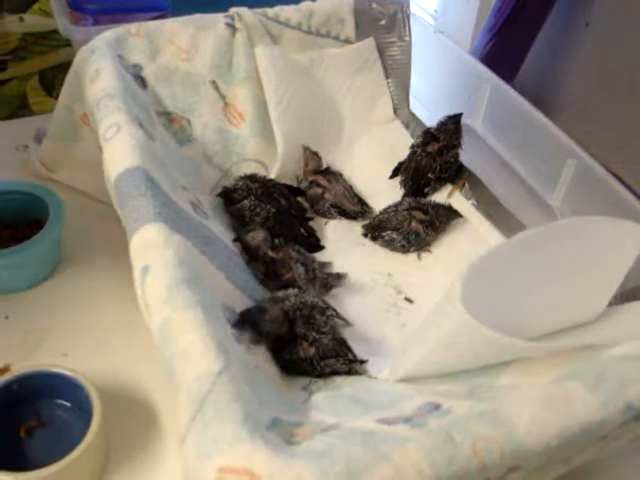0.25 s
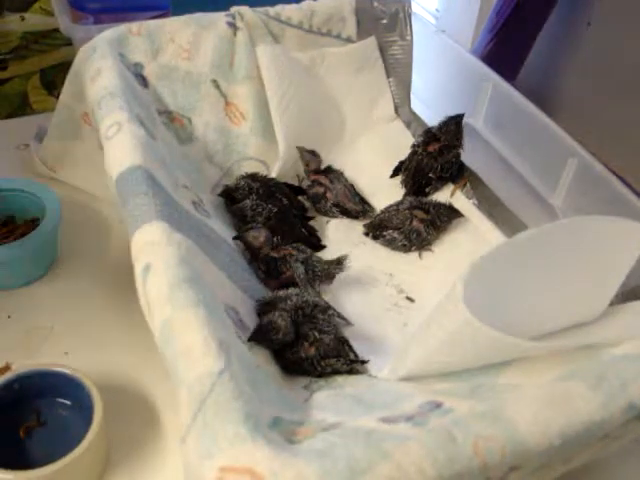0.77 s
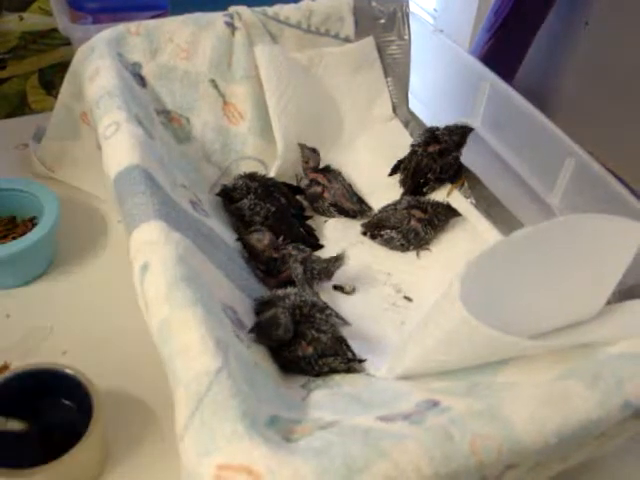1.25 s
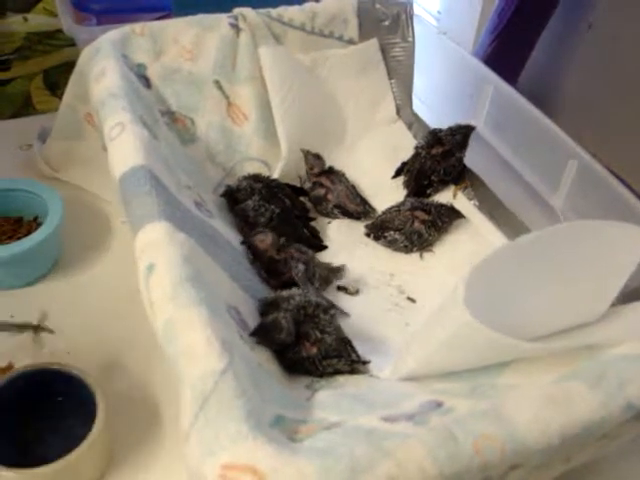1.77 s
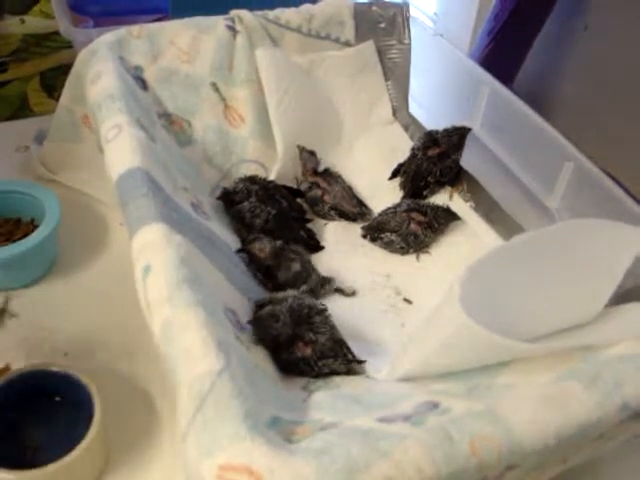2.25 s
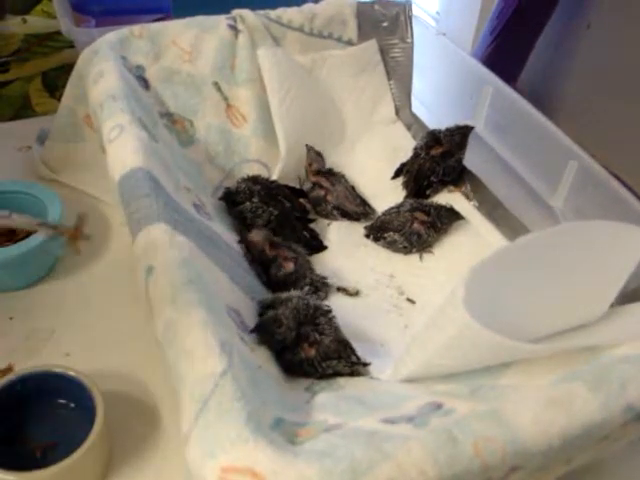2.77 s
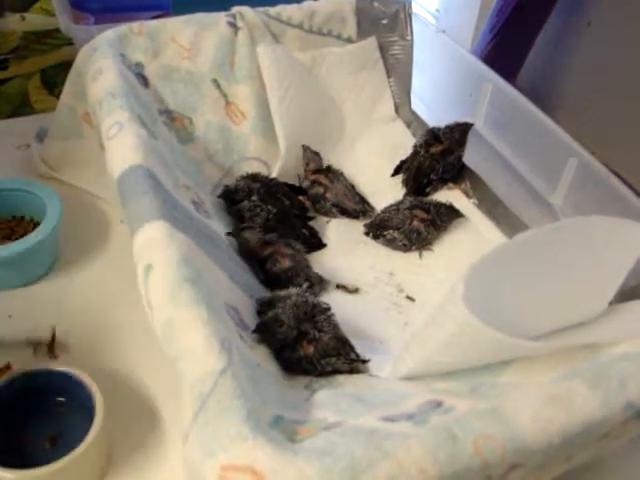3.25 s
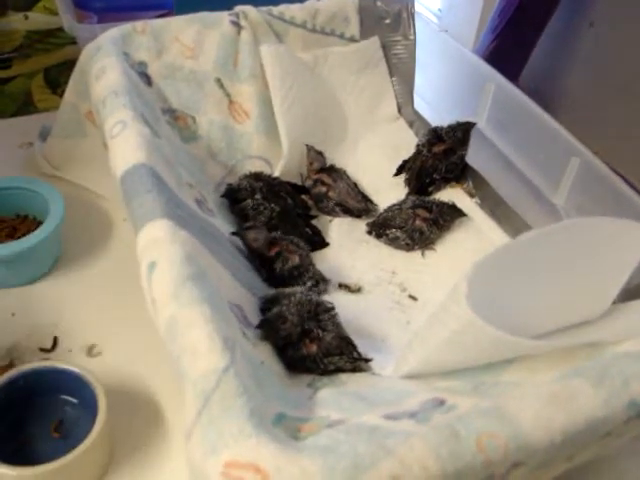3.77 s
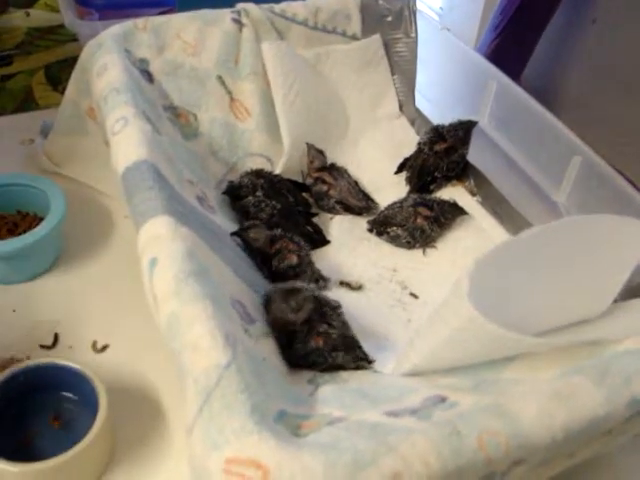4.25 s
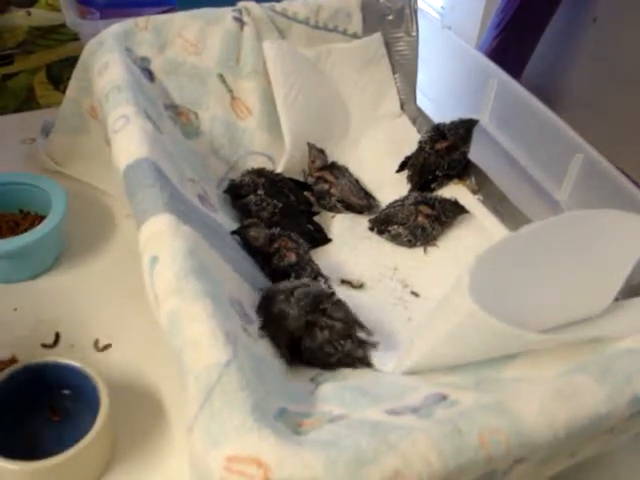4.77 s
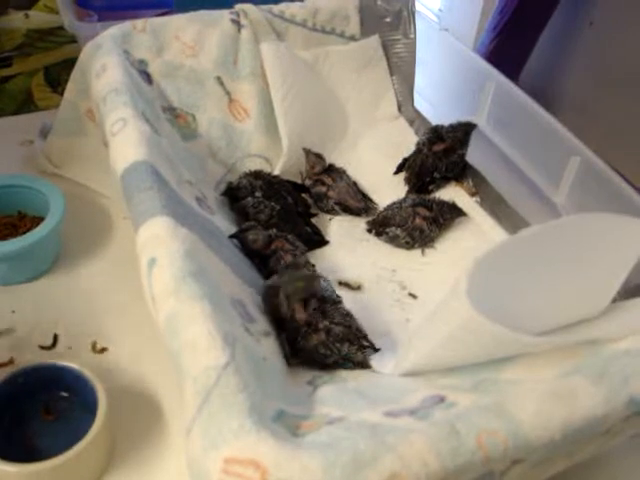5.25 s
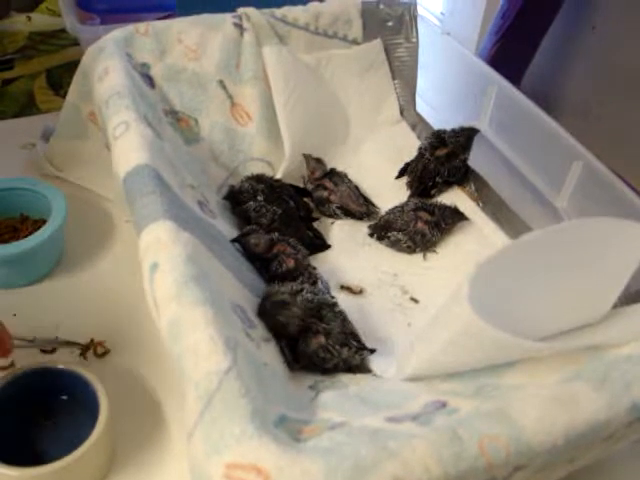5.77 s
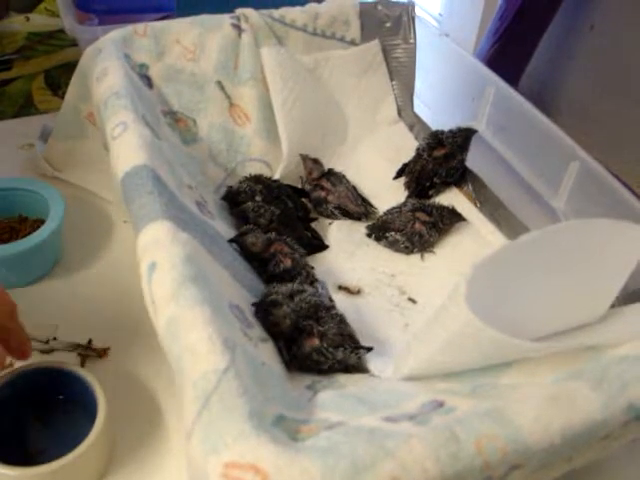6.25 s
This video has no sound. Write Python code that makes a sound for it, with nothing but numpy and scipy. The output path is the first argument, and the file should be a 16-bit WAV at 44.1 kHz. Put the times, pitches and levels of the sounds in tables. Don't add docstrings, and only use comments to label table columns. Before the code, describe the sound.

Hungry nestlings call from a cloth-lined plastic tub indoors. Bright, snapping chirps with a raspy fall repeat about three times a second, mixed with fainter peeps, tiny ticks and a few long fluttering whistles that sag in pitch. Later chirps are softer, and a whistle comes near the end. A quiet motor hum and fan hiss continue beneath. A small camera microphone hears it close, with slightly thin, patchy treble.

```python
import sys
import numpy as np
from scipy import signal
from scipy.fft import rfft, irfft
from scipy.io import wavfile
from scipy.ndimage import uniform_filter1d, minimum_filter1d

SR = 44100
rng = np.random.default_rng(int(sys.argv[2]) if len(sys.argv) > 2 else 0)


def wav_out(sig):
    wavfile.write(sys.argv[1], SR, np.round(np.clip(np.atleast_2d(sig).T, -1, 1) * 32767).astype(np.int16))


def ratio(d):
    e = np.asarray(d, float) / 20
    return 10 ** e


N = 287091
TOP_HZ = 10020


def band(x, lo_hz, hi_hz, order=2):
    return signal.sosfiltfilt(signal.butter(order, [lo_hz, hi_hz], "band", fs=SR, output="sos"), x)


def unit(x):
    return x / np.sqrt(np.mean(x ** 2))


def walk(rate, size=N):
    k = int(SR / max(rate, .1)) + 1
    steps = np.repeat(rng.standard_normal(size // 20 + 2)[:size // k + 1], k)
    return 1.89 * uniform_filter1d(uniform_filter1d(steps, k), k)[:size]


# t/s, shaft f/Hz, level of the fifth multiple/dB
MOTOR_SPEED = [(0, 76.05, -42.5), (0.899, 73.9, -50), (1.597, 73.7, -45.5), (2.598, 71.74, -44),
               (2.9, 70.7, -43.5), (3.198, 73.76, -43), (3.4, 76.5, -42.5), (4.1, 76.76, -40),
               (4.901, 76.97, -43.5), (6.51, 76.45, -40)]
# multiple of the shaft rate, level/dB
MOTOR_MULTIPLES = [(2, -12), (3, -10.5), (4, -5), (5, 1), (6, -5.5), (7, -4.5), (8, -11), (9, -23.5)]
# f/Hz, level/dB
STEADY_HUM = [(57, -58), (70, -53), (119.5, -48), (824, -51), (904, -62.5), (964, -57), (1076, -52.5),
              (1130, -62)]
# f/Hz, level/dB per Hz
FAN_COLOUR = [(12, -61.5), (20, -49), (121, -6.5), (188, -9), (369, 0.5), (410, -3.5), (690, -6.5),
              (1070, -5), (1220, -7.5), (1510, -7.5), (3740, -20.5), (5530, -21.5), (9070, -28.5),
              (10100, -41), (13100, -86), (22000, -120)]


def appliances():
    t = np.arange(N) / SR
    s, hz, db = np.transpose(MOTOR_SPEED)
    motor_db = np.interp(t, s, db)
    turn = 2 * np.pi * np.cumsum(np.interp(t, s, hz) * (1 + 0.0013 * walk(6.04))) / SR
    motor = sum(ratio(d + walk(7.2)) * np.sin(k * turn + walk(4)) for k, d in MOTOR_MULTIPLES)
    hum = sum(ratio(d + 0.69 * walk(3.24)) * np.sin(2 * np.pi * f * t + 0.32 * walk(3.1))
              for f, d in STEADY_HUM)
    f = np.maximum(np.arange(N // 2 + 1) * SR / N, 1)
    fan_hz, fan_db = np.transpose(FAN_COLOUR)
    colour = ratio(np.interp(np.log(f), np.log(fan_hz), fan_db))
    hiss = unit(irfft(rfft(rng.standard_normal(N)) * colour, N))
    hiss = hiss * ratio(-38 + walk(1.8) / 4 + 0.45 * (motor_db + 45.5))
    return np.sqrt(2) * (ratio(motor_db) * motor + hum) + hiss


def sing(notes, edge_ms, flutter_db, flutter_rate, rough, rough_hz, break_up, half_db, overtone_db, voiced_hz,
         rasp_db, rasp_ms, hiss_db):
    out = np.zeros(N)
    wobble, sway, near, far, grit = (walk(rate) for rate in (flutter_rate, 150, rough_hz, rough_hz, 450))
    noise = rng.standard_normal((3, N))
    chest = unit(band(noise[0], 2020, 4300))
    air = unit(band(noise[1], 3100, 6960))
    hiss = unit(band(noise[2], 6200, 9150))
    rasp = ratio(4.0 * grit) * (chest + ratio(-3) * air)
    edge = edge_ms / 1000
    hold = np.linspace(1, 0, int(rasp_ms * SR / 1000) + 2)
    for note in notes:
        s, hz, db = np.transpose(note)
        span = slice(max(int((s[0] - edge) * SR), 0), int((s[-1] + .1) * SR))
        t = np.arange(span.start, span.stop) / SR
        pitch = uniform_filter1d(np.interp(t, s, hz), 120) * (1 + 0.0015 * sway[span])
        phase = 2 * np.pi * np.cumsum(pitch) / SR
        fade = np.clip(np.minimum(t - s[0] + edge, s[-1] + edge - t) / edge, 0, 1) ** 2
        level = fade * ratio(np.interp(t, s, db))
        falling = np.clip((t - s[np.argmax(hz)] - .004) / .008, 0, 1)
        level = level / (1 + (np.gradient(pitch) * SR / 450000) ** 4) ** .5
        flutter = ratio(flutter_db * wobble[span])
        sag = np.clip(3 * (1 - pitch / hz.max()), 0, 1)
        smear = rough * (1 + break_up * falling * sag)
        tone = (flutter + smear * near[span]) * np.sin(phase) + smear * far[span] * np.cos(phase)
        half = ratio(half_db) * np.clip(pitch / 1500 - 3.6, 0, 1) * (0.22 + far[span]) * np.sin(phase / 2)
        slack = (flutter + smear * far[span]) * ratio(overtone_db) / (1 + (pitch / voiced_hz) ** 4)
        fourth = 0.25 * np.sin(4 * phase) * (pitch < 2500)
        rich = slack * (np.sin(2 * phase) + 0.23 * np.sin(3 * phase) + fourth)
        voice = np.sqrt(2) * ((tone + rich) / np.sqrt(1 + 2 * smear ** 2) + half) + ratio(hiss_db) * hiss[span]
        spill = np.sqrt(signal.fftconvolve((falling * level) ** 2, hold / hold.sum())[:len(t)].clip(0))
        out[span] += level * voice + ratio(rasp_db) * spill * rasp[span]
    return out


def glides(rows, shape):
    return [[(s + size * at, a + (b - a) * way, db + under) for at, way, under in shape]
            for s, size, a, b, db in rows]


def arches(rows, arch, snap):
    made = []
    for s, size, top, db, snap_db in rows:
        climb = [(s - size * (1 - at), hz * top / arch[2][1], db + under) for at, hz, under in arch]
        fall = [(s + later, hz, snap_db + under) for later, hz, under in snap]
        made.append(climb + fall)
    return made


# snap t/s, arch length/s, top f/Hz, arch level/dB, snap level/dB
BOLD_CHIRPS = [(.06, .035, 7740, -12, -18.5), (0.323, 0.033, 8670, -13, -18.5),
               (0.569, 0.039, 8270, -16.5, -15.5), (.873, 0.026, 8160, -13, -12.5),
               (1.178, 0.034, 8020, -16, -13.5), (1.92, 0.028, 7300, -21.5, -12),
               (2.594, .034, 7670, -20.5, -10.5), (2.928, 0.027, 7467, -18, -13),
               (3.271, 0.022, 6780, -18.5, -12)]
# snap t/s, arch length/s, top f/Hz, arch level/dB, snap level/dB
SOFT_CHIRPS = [(3.963, .035, 6190, -21, -20.5), (4.247, .043, 7950, -23.5, -19),
               (4.58, .032, 8120, -20, -17.5), (4.862, 0.03, 7967, -22, -17),
               (5.132, 0.032, 8030, -28, -16.5), (5.586, 0.025, 5880, -27, -18),
               (5.886, 0.031, 7190, -26.5, -17)]
# share of length, f/Hz in the highest voice, level under the arch/dB
ARCH_SHAPE = [
    (0, 6300, -11),
    (0.279, 7450, -4.5),
    (0.621, 8060, 0),
    (0.798, 7298, -6.5),
]
# t after the snap/s, f/Hz, level under the snap/dB
BOLD_SNAP = [
    (0, 5070, 0.5),
    (.007, 2320, -16),
    (0.017, 2190, -26.5),
]
# t after the snap/s, f/Hz, level under the snap/dB
SOFT_SNAP = [(-.004, 4675, -1), (.001, 4197, 2.5), (.008, 3550, -4.5), (.012, 2400, -26),
             (0.02, 2150, -15.5)]


def chirps():
    notes = arches(BOLD_CHIRPS, ARCH_SHAPE, BOLD_SNAP) + arches(SOFT_CHIRPS, ARCH_SHAPE, SOFT_SNAP)
    return sing(notes, edge_ms=5, flutter_db=2.5, flutter_rate=300, rough=.32, rough_hz=1600, break_up=3.6,
                half_db=-19.5, overtone_db=-14, voiced_hz=3600, rasp_db=-8.5, rasp_ms=20, hiss_db=-13)


# start t/s, length/s, from f/Hz, to f/Hz, level/dB
TICK_NOTES = [(.07, 0.0097, 8370, 8050, -23), (.725, 0.018, 3078, 2265, -35.5),
              (1.33, 0.03, 6030, 4870, -39), (1.372, .022, 2960, 3900, -42), (1.396, .018, 3900, 3430, -38),
              (1.79, 0.017, 5122, 4270, -39), (2.31, 0.025, 2412, 2097, -32.5),
              (3.277, 0.0073, 2332, 2500, -24), (3.46, 0.044, 3143, 2030, -32),
              (3.718, 0.0028, 5400, 2620, -26), (3.792, 0.026, 5873, 4370, -36.5),
              (3.79, .025, 2920, 2567, -33.5), (5.742, 0.0033, 3420, 2600, -25.5),
              (5.755, 0.036, 2430, 2100, -37.5), (5.905, 0.014, 4575, 4240, -34)]
# share of length, share of the glide, level/dB
TICK_SHAPE = [(0, 0, -6), (.45, .35, 0), (1, 1, -5)]


def ticks():
    return sing(glides(TICK_NOTES, TICK_SHAPE), edge_ms=4, flutter_db=2.5, flutter_rate=200, rough=.3,
                rough_hz=800, break_up=.5, half_db=-24, overtone_db=6, voiced_hz=2640,
                rasp_db=-10.5, rasp_ms=12, hiss_db=-22.5)


# start t/s, length/s, from f/Hz, to f/Hz, level/dB
PEEP_NOTES = [(.12, 0.19, 6060, 5140, -37.5), (.9, 0.048, 5730, 6020, -32), (1.0, 0.39, 5240, 5400, -43.5),
              (1.05, 0.12, 6200, 6100, -44.5), (1.215, 0.12, 6480, 6270, -40.5),
              (1.46, 0.096, 5520, 6550, -48.5), (1.525, 0.24, 6550, 6280, -47.5),
              (1.59, 0.3, 5714, 5780, -41), (1.81, .055, 8120, 7400, -47), (1.97, 0.08, 6930, 6740, -43),
              (2.03, 0.21, 5070, 5400, -48.5), (2.08, 0.037, 7150, 7190, -43.5),
              (2.135, 0.098, 6470, 5260, -27), (2.64, 0.079, 5400, 5450, -48),
              (2.805, 0.047, 4860, 5070, -47.5), (3.02, 0.069, 6760, 5600, -50),
              (3.165, .025, 6070, 5600, -36), (4.33, .115, 5340, 5150, -44.5),
              (4.475, 0.077, 6240, 5605, -24), (4.89, .06, 4500, 4870, -38.5),
              (5.02, 0.045, 7660, 6630, -46), (5.22, .13, 6900, 6820, -43), (5.46, 0.04, 5000, 5030, -41.5),
              (5.488, 0.061, 6220, 5450, -27.5)]
# share of length, share of the glide, level/dB
PEEP_SHAPE = [(0, 0, -4), (.25, .1, 0), (.6, .55, -2), (1, 1, -4)]
# start t/s, f/Hz, level/dB, time to fade away/s
HANGING_TONES = [
    (0.317, 5710, -24, 0.09),
    (.573, 5080, -13.5, 0.018),
    (1.931, 4420, -24.5, 0.025),
    (2.605, 4540, -16, 0.012),
]


def peeps():
    hangs = [[(s, hz, db), (s + size, hz, db - 22.5)] for s, hz, db, size in HANGING_TONES]
    return sing(glides(PEEP_NOTES, PEEP_SHAPE) + hangs, edge_ms=5, flutter_db=3.0, flutter_rate=110, rough=.65,
                rough_hz=800, break_up=.3, half_db=-23, overtone_db=9, voiced_hz=2720,
                rasp_db=-21.0, rasp_ms=12, hiss_db=-24.0)


# start t/s, length/s, from f/Hz, to f/Hz, level/dB
WHISTLE_LEAD_IN = [
    (.585, .045, 5250, 6010, -26),
    (3.29, 0.083, 5720, 6090, -18.5),
]
# start t/s, length/s, top f/Hz, first swell level/dB, second swell level/dB
WHISTLE_NOTES = [
    (0.629, .165, 6070, -15.5, -19.5),
    (2.261, .195, 6165, -12, -16.5),
    (3.361, .175, 6090, -11, -17.5),
    (4.564, .195, 6070, -10.5, -16),
    (6.014, 0.22, 5957, -15, -16.5),
]
# share of length, f/Hz, share of the second swell, level/dB
WHISTLE_SHAPE = [(0, 6150, 0, -7), (.1, 6100, 0, 0), (.4, 5920, .5, -5), (.6, 5690, 1, 0),
                 (.73, 5410, 1, -2), (.87, 4960, 1, -6), (1, 4280, 1, -12)]


def whistles():
    sags = [[(s + size * at, hz * top / WHISTLE_SHAPE[1][1], first + (second - first) * late + under)
             for at, hz, late, under in WHISTLE_SHAPE] for s, size, top, first, second in WHISTLE_NOTES]
    return sing(sags + glides(WHISTLE_LEAD_IN, PEEP_SHAPE), edge_ms=8, flutter_db=2.0, flutter_rate=200,
                rough=.22, rough_hz=1000, break_up=2.6, half_db=-41.5, overtone_db=-7, voiced_hz=3900,
                rasp_db=-41, rasp_ms=15, hiss_db=-49.0)


# centre t/s, length/ms
WHISTLE_DROPOUTS = [(0.6769, 17.8), (0.6932, 4.4), (0.7018, 2.9), (2.2664, 11.3), (2.2846, 3.3),
                    (2.4064, 5.7), (3.321, 3.0), (3.3263, 3.4), (3.336, 3.4), (3.3517, 3.7), (3.3615, 7.9),
                    (3.3751, 2.9), (3.4026, 11.0), (4.5952, 5.0), (4.6464, 5.0), (4.6558, 5.1),
                    (4.6877, 3.9), (6.0473, 6.0), (6.079, 3.0), (6.093, 3.0), (6.1185, 3.7), (6.1351, 6.5),
                    (6.1568, 3.7), (6.1863, 3.5), (6.21, 3.5)]


def dropouts():
    db = np.zeros(N)
    for s, ms in WHISTLE_DROPOUTS:
        db[int((s - ms / 2000) * SR):int((s + ms / 2000) * SR)] = -21
    return uniform_filter1d(ratio(db), 70)


# t/s, low voice f/Hz, high voice f/Hz, swing f/Hz, low voice level/dB
WARBLE_PATH = [
    (1.222, 3080, 3960, 500, -39),
    (1.258, 2954, 4000, 380, -31),
    (1.292, 2850, 3605, 370, -35.5),
    (1.321, 2705, 3400, 100, -39),
    (1.372, 2500, 2660, 11, -50),
]


def warble():
    vibrato_hz, vibrato_top_s = 47.4, 1.255
    s, *columns = np.transpose(WARBLE_PATH)
    t = np.arange(N) / SR
    low, high, swing, low_db = (np.interp(t, s, c) for c in columns)
    wave = np.cos(2 * np.pi * vibrato_hz * (t - vibrato_top_s))
    gate = uniform_filter1d(1. * (t > s[0]) * (t < s[-1]), 300) * ratio(2.3 * wave * swing / 300)
    voices = (ratio(db) * np.sin(2 * np.pi * np.cumsum(hz + swing * wave) / SR)
              for hz, db in ((low, low_db), (high, low_db + 2.5)))
    return np.sqrt(2) * gate * sum(voices)


# start t/s, length/s, top f/Hz, level/dB
HALF_CHIRPS = [(1.556, .018, 5230, -32), (2.164, 0.024, 4900, -30), (2.294, 0.014, 4800, -19),
               (2.468, .02, 4872, -31.5), (2.939, 0.016, 5920, -30), (3.117, 0.022, 6900, -29),
               (3.743, 0.026, 5680, -31), (3.828, 0.014, 4740, -27), (3.965, .022, 4570, -33.5),
               (4.153, 0.032, 5280, -25), (4.5, .033, 5260, -31), (5.058, 0.025, 4836, -30.5),
               (6.316, 0.019, 3250, -38.5), (6.372, 0.017, 3080, -33.5)]
# share of length, share of the way down, level/dB
FALL_SHAPE = [(0, 0, -10), (.4, .12, -2), (.7, .5, 0), (1, 1, -10)]


def half_chirps():
    end_hz = 2284
    notes = glides([(s, size, top, end_hz, db) for s, size, top, db in HALF_CHIRPS], FALL_SHAPE)
    return sing(notes, edge_ms=5, flutter_db=2.5, flutter_rate=300, rough=.5, rough_hz=1600, break_up=2,
                half_db=-18, overtone_db=-16, voiced_hz=3000, rasp_db=-4.5, rasp_ms=28, hiss_db=-12.5)


def room(x, t60_s, wet_db, near_t60_s, near_db, delay_ms):
    t = np.arange(SR // 2) / SR
    noise = rng.standard_normal((2, len(t)))
    near = noise[0] * ratio(-60 * t / near_t60_s) * (t > .002)
    build_up = np.clip(t * 1000 / delay_ms, 0, 1) ** 2
    tail = band(noise[1], 330, 8100, order=1) * ratio(-60 * t / t60_s) * build_up
    echo = ratio(near_db) * near / np.linalg.norm(near) + ratio(wet_db) * tail / np.linalg.norm(tail)
    return x + signal.fftconvolve(x, echo)[:N]


def scene():
    short_calls = chirps() + half_chirps() + ticks() + peeps() + warble()
    short = room(short_calls, t60_s=.3, wet_db=-14, near_t60_s=.08, near_db=-8, delay_ms=22)
    long = room(whistles(), t60_s=.28, wet_db=-11, near_t60_s=.05, near_db=-17, delay_ms=35)
    return (short + dropouts() * long + appliances())[None]


def thin_treble(x, from_hz, width_hz, keep_db, drop_db, luck_db):
    f, _, z = signal.stft(x, SR, nperseg=512)
    noise = signal.stft(rng.standard_normal(N), SR, nperseg=512)[2]
    edges = np.searchsorted(f, np.arange(from_hz, TOP_HZ + width_hz, width_hz))
    bands = [slice(a, b) for a, b in zip(edges[:-1], edges[1:])]
    rms = np.array([np.sqrt(np.mean(abs(z[b]) ** 2, axis=0)) for b in bands])
    nearby = -minimum_filter1d(-rms, size=5, axis=0)
    loudest = -minimum_filter1d(-nearby, size=3, axis=1)
    treble = rms.sum(axis=0)
    surge = np.clip(-minimum_filter1d(-treble, size=7) / treble, 1, ratio(26))
    luck = ratio(luck_db * np.repeat(rng.standard_normal((20, N // 512 + 2)), 2, axis=1))
    for b, level, top, chance in zip(bands, rms, loudest, luck):
        share = level / top
        kept = np.clip(share / ratio(keep_db), 0, 1)
        fill = noise[b] * level / np.sqrt(np.mean(abs(noise[b]) ** 2))
        strength = share ** 0.38 * chance[:len(level)] / surge / ratio(drop_db)
        alive = np.clip(3 * (strength - .7), 0, 1)
        z[b] = alive * (kept * z[b] + np.sqrt(1 - kept ** 2) * fill)
    return signal.istft(z, SR, nperseg=512)[1][:N]


def treble_gaps(x):
    ahead_ms, after_ms = 21, 12
    gaps = []
    for rows, above_hz in ((BOLD_CHIRPS, 5200), (SOFT_CHIRPS, 6300)):
        gaps += [(s - size - .004 - ahead_ms / 1000, ahead_ms, above_hz) for s, size, *_ in rows]
    gaps += [(s + .018, after_ms, 6300) for s, *_ in BOLD_CHIRPS + SOFT_CHIRPS]
    for s, ms, above_hz in gaps:
        a, b = max(int(s * SR), 0), int((s + ms / 1000) * SR)
        lo = max(a - 400, 0)
        treble = band(x[lo:b + 400], above_hz, 15000, order=6)[a - lo:b - lo]
        x = np.concatenate([x[:a], x[a:b] - signal.windows.tukey(b - a, .3) * treble, x[b:]])
    return x


def low_pass(x):
    return signal.sosfilt(signal.butter(12, 10220, fs=SR, output="sos"), x)


def record(dry):
    x = np.tanh(1.3 * dry[0]) / 1.3
    thud = band(0.16 * x ** 2, 12, 45)
    x = thin_treble(x + thud, from_hz=2700, width_hz=690, keep_db=-18, drop_db=-28, luck_db=13.0)
    x = treble_gaps(x)
    x = signal.sosfilt(signal.ellip(10, .2, 70, TOP_HZ, fs=SR, output="sos"), x)
    return low_pass(x[None])


dry = scene()
out = record(dry)
wav_out(out)
```